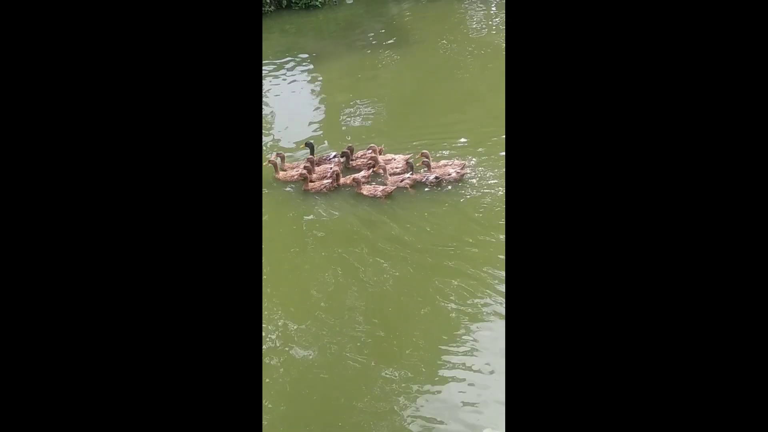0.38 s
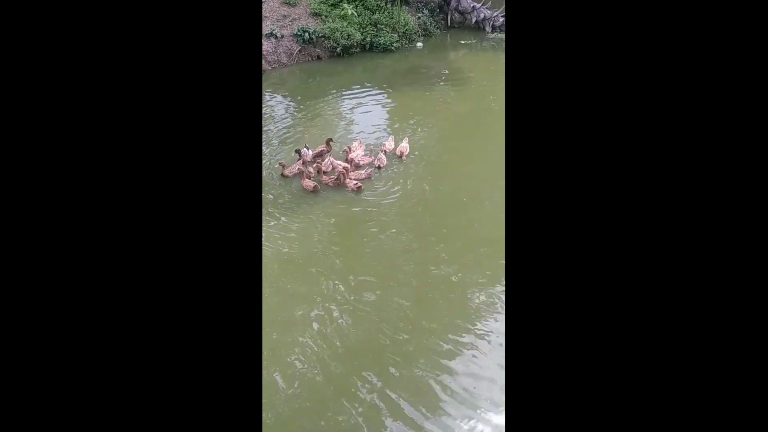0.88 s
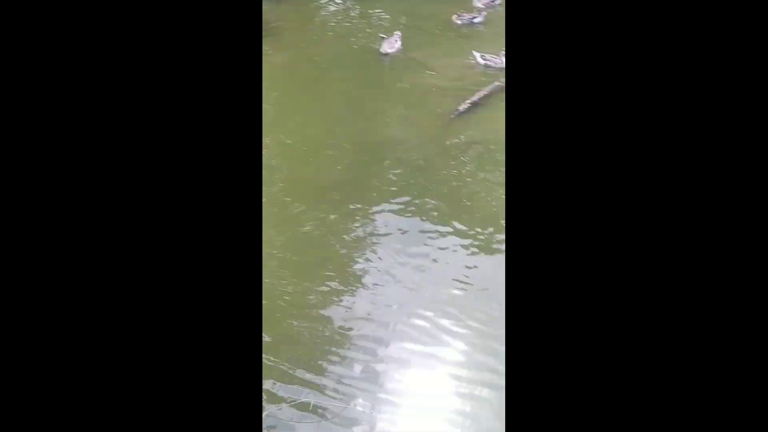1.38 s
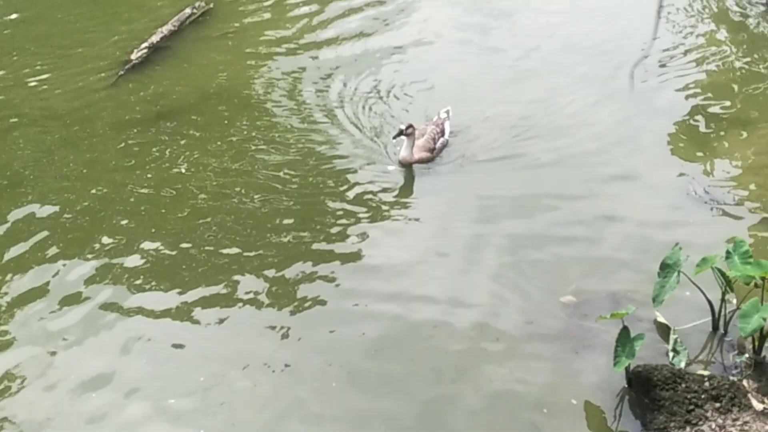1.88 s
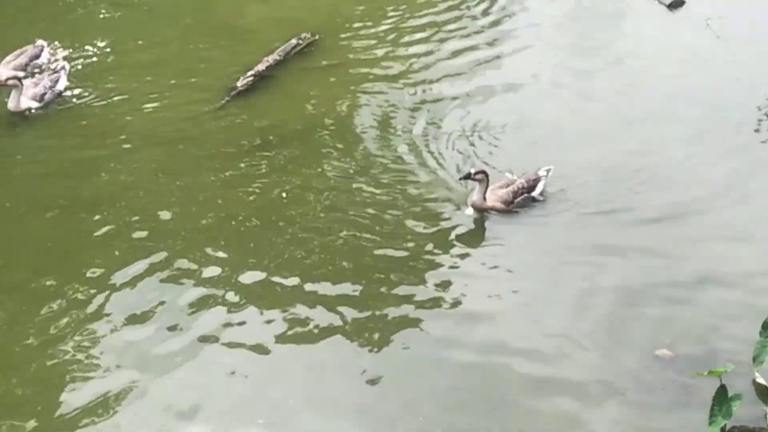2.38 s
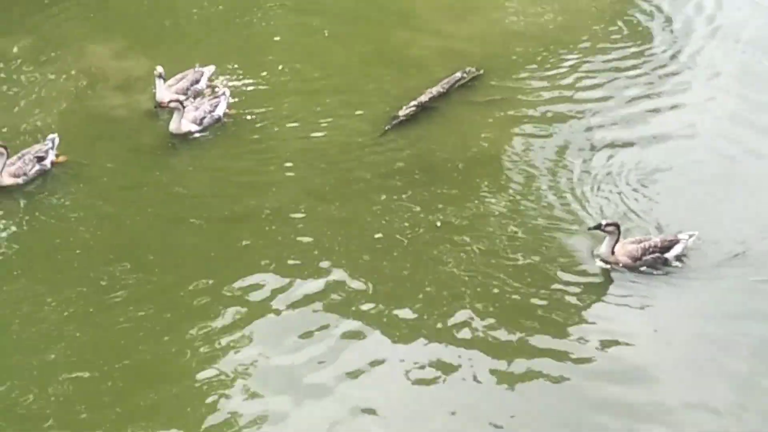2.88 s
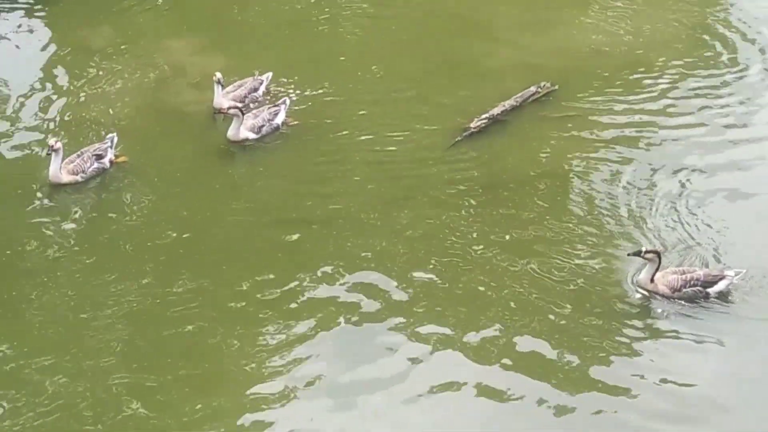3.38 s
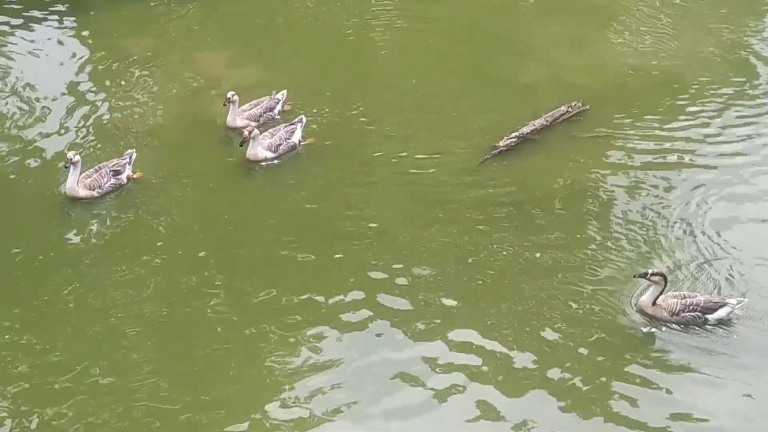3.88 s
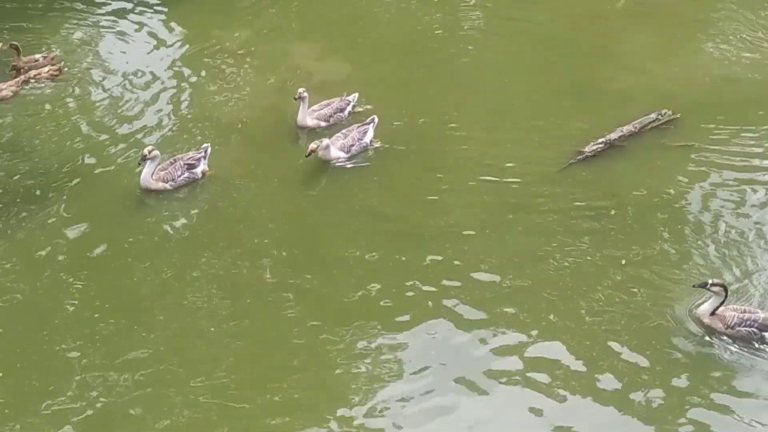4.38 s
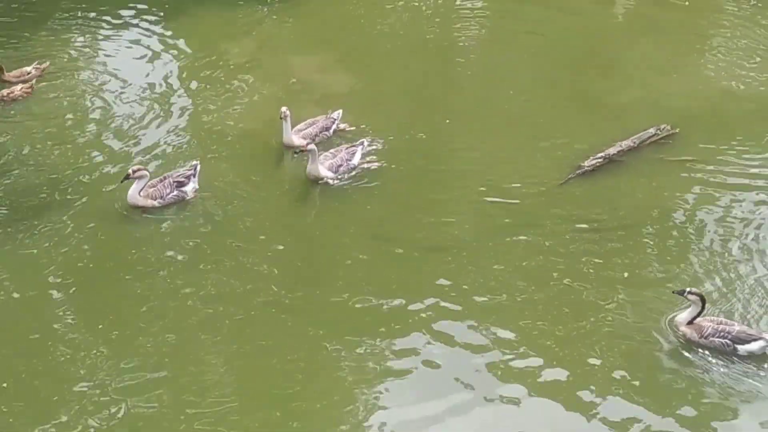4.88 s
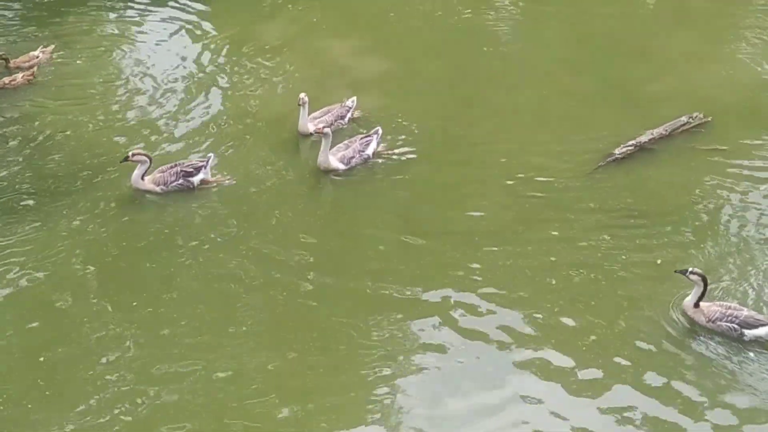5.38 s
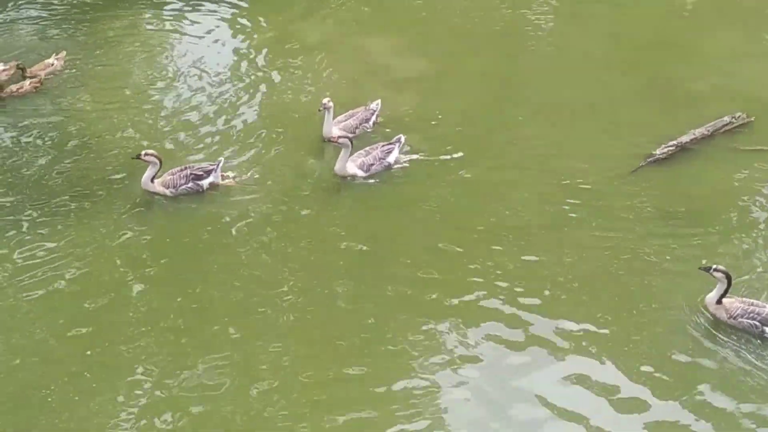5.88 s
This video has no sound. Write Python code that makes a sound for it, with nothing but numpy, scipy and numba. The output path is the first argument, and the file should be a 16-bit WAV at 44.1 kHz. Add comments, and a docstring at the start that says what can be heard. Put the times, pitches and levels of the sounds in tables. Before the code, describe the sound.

From 0 to about 1.9 s a flock of geese and ducks is loud and crowded: low throaty grunts, short quacks and nasal honks near 900 to 1000 Hz overlap in broad, swelling outdoor noise, strongest calls around 0.25, 0.55 to 0.75 and 1.0 to 1.3 s. A small tick comes at 1.6 s, then a rub and dull thump on the case at 1.85 s, a hard cut and about a tenth of a second of silence. From 2 s a far quieter pond fades in: soft air, faint insect shimmer, brief gliding bird whistles and a tiny trill until 3.9 s, with faint rough quacks. At 4.4 s a near goose growls into a ringing honk around 1400 Hz, rasps, then at 4.9 s gives a lower, harsher honk near 940 Hz that drops away by 5.2 s with dull bank echoes. Rough quacks return at 5.6 and 5.96 s. Nearly everything sits right; the thump reaches both sides.

```python
"""Geese and ducks on a pond, heard from the bank by a phone whose left port is nearly deaf to the air.
A honk is a ringing windpipe tone with harmonics, side tones and rasp from the slower flutter of the voice
membranes; quacks, grunts and growls are rough pulses through a throat, songbirds are gliding whistles.
A loud flock scene ends in a handling bump and a short silence; a quieter scene fades in with songbirds,
far quacks and a near double honk. Air is swelling noise, banks send scattered echoes, thuds are damped sines."""
import sys
import numpy as np
from scipy import signal
from scipy.fft import rfft, irfft
from scipy.io import wavfile
from scipy.ndimage import uniform_filter1d, map_coordinates
from numba import njit

SR = 44100
rng = np.random.default_rng(int(sys.argv[2]) if len(sys.argv) > 2 else 0)


def volts(x):
    """Linear amplitude factor 10**(x/20) for a level x in dB, scalar or array-like."""
    e = np.asarray(x, float) / 20
    return 10 ** e


def file_out(sig):
    """Save sig as 16-bit WAV at sys.argv[1]."""
    # one column per channel
    cols = np.atleast_2d(sig).T
    # limit, then scale
    lim = np.clip(cols, -1, 1)
    pcm = np.round(lim * 32767).astype(np.int16)
    wavfile.write(sys.argv[1], SR, pcm)


N = 265041
T = np.arange(N) / SR

# Levels of air and voices are relative: PORT_GAIN follows.
PORT_GAIN, LEFT_LEAK_DB = 2.016, -46.5  # leak of the deaf port, relative to the right one

# Pond air, leaves and far flock, relative spectrum: (frequency [Hz], density [dB])
AIR_SPECTRUM = [(18, -72), (30, -22), (92, -2.5), (359, 0), (546, 4), (874, -0.5), (1640, -6), (2420, -6.5),
                (2760, -8.5), (3980, -8.5), (5040, -11.5), (7460, -9.5), (9430, -14), (10700, -12.5),
                (15500, -33)]
# Pond air level: (time [s], level [dB])
AIR_LEVEL = [(0.0, -44), (0.81, -39.5), (0.92, -46.5), (1.11, -38), (1.31, -42.5), (1.9, -44.5),
             (1.95, -53.5), (2.27, -56), (2.4, -56.5), (3.8, -56), (4.07, -54.5), (4.27, -56.5),
             (4.4, -57.5), (5.3, -51.5), (5.64, -54), (5.79, -58.5), (6.01, -56.5)]
# Insect shimmer: (centre [Hz], width [Hz], level relative to the air [dB])
INSECTS = [(7500, 700, -22), (10950, 250, -25), (14050, 30, -43)]
AIR_SWELL_DB, AIR_FLICKER_DB, INSECT_SWELL_DB = 1.5, 1.5, 5
BANKS_T60_S, BANKS_DB, BANKS_LOWPASS_HZ = 0.5, -18, 1300
LEAF_STIR_MS, LEAF_STIR_PER_S = .12, 45  # moving leaves and ripples blur the echoes

# Hand on the case: (time [s], frequency [Hz], T60 [s], left level [dB], right level [dB])
BUMPS = [(1.855, 107, 0.037, -13.5, -18), (1.6, 900, 0.0045, -19.5, -47), (2.2204, 196, 0.06, -75, -30),
         (2.9, 250.2, 0.0095, -38, -70)]
# Finger rub: (time [s], level [dB])
RUB_LEVEL = [(1.8, -48.5), (1.83, -32), (1.855, -25), (1.87, -30.5), (1.89, -41.5)]

# Songbird notes: (start [s], length [s], first pitch [Hz], last pitch [Hz], level [dB])
BIRD_NOTES = [(1.998, 0.094, 3120, 2920, -53), (2.241, 0.06, 3250, 3070, -65),
              (2.242, 0.031, 5600, 5600, -61), (2.298, 0.072, 4400, 4100, -70),
              (2.348, 0.054, 3850, 3400, -64.5), (2.413, 0.077, 2305, 2240, -63),
              (2.467, 0.036, 1930, 1910, -60.5), (2.65, 0.093, 3250, 3130, -64),
              (2.93, 0.046, 3400, 3500, -64), (2.947, 0.037, 5050, 4650, -60),
              (2.976, 0.072, 4200, 3680, -63), (3.045, 0.058, 3200, 3020, -73),
              (3.53, 0.065, 4690, 4600, -62), (3.58, 0.12, 3020, 2990, -62.5),
              (3.86, 0.079, 3480, 3580, -65)]
# Songbird trill: (start [s], length [s], first pitch [Hz], last pitch [Hz], level [dB], pulse rate [1/s])
BIRD_TRILLS = [(3.735, 0.125, 2980, 3520, -61, 62)]
# Songbird swell: (share of length [0-1], level offset [dB])
NOTE_SHAPE = [(0, -9), (.3, 2), (.7, -2.5), (1, -16)]
BIRD_WAVER_RATIO, BIRD_WAVER_DB = .011, 3.5

# Throat resonances, five tables: (centre [Hz], nominal width [Hz], relative level [dB])
GRUNT_THROAT = [(182.4, 31, -13.5), (470, 90, -15), (680, 61, 1), (830, 64, -5.5), (960, 210, -13),
                (1400, 175, -11.5), (2700, 71, -11.5), (4230, 480, -9)]
QUACK_THROAT = [(242, 120, -14), (850, 176, -4.5), (1550, 340, -5.5), (1844, 100, 1.5), (2255, 183, 2.5),
                (3400, 730, -1), (4420, 540, -2.5), (5900, 1600, -5.5)]
FAR_THROAT = [(1040, 410, -5), (1824, 290, -7), (2670, 290, -4.5), (4200, 1200, -7), (6200, 390, -14.5),
              (7400, 880, -11.5)]
FIRST_THROAT = [(1400, 280, -1), (1910, 71, 0.5), (2860, 560, -1), (3600, 150, 2), (4510, 270, 2),
                (4910, 216, 9.5), (6100, 830, -8.5), (7780, 1220, 0), (11700, 580, -16), (13700, 3000, -24)]
SECOND_THROAT = [(1090, 105, -0.5), (1880, 940, -13), (2966, 166, 5), (4080, 340, -2), (4640, 410, -4),
                 (5600, 1600, -7.5), (9460, 2900, -5.5), (10640, 3200, -13)]
# Growl throat: (centre [Hz], nominal width [Hz], relative level [dB])
GROWL_THROAT = [(170, 78, -23.5), (626, 57, -13.5), (1410, 226, 3.5), (1750, 220, 0.5), (2020, 570, -1),
                (3030, 240, -7), (3820, 320, 1.5), (4710, 660, 3), (5480, 1230, 8.5), (8400, 3000, -5),
                (11070, 2300, -21)]
WIDTH_FACTOR = 2.18  # on the nominal width, for each of two passes
THROAT_HZ, BEAK_HZ, SLIDE_TOP_HZ = 1550, 2500, 6500
PATCHY_DB = 3.5  # separate flicker of each resonance in rasps and pulsed calls
# Resonances that stay put: (time [s], pitch factor)
STILL = [(0, 1), (7, 1)]

# Low grunts, and at 1.055 s the bright upper rasp of a far honk:
# (start [s], length [s], pulse rate [Hz], level [dB], beak level [dB])
GRUNTS = [(0.005, 0.069, 170, -35.5, -42.5), (0.19, 0.18, 172.3, -37.5, -46.5),
          (0.35, 0.22, 198.7, -42, -54), (0.55, 0.066, 187, -34, -60), (0.66, 0.12, 164.6, -28, -45.5),
          (0.835, 0.11, 168.2, -36.5, -46.5), (0.935, 0.085, 168.9, -32.5, -38.5),
          (1.055, 0.16, 174.8, -71.5, -36), (1.2, 0.13, 163.7, -42, -49)]
# Quacks: (start [s], length [s], pulse rate [Hz], level [dB], beak level [dB])
QUACKS = [(0.01, 0.099, 132, -40.5, -55), (0.68, 0.082, 162.7, -57, -32), (0.935, 0.069, 121.5, -57, -36.5),
          (2.32, 0.22, 129, -62.5, -70), (2.64, 0.13, 151.6, -61.5, -62.5), (2.97, 0.13, 150.6, -55.5, -56),
          (3.18, 0.073, 152.3, -57.5, -68), (3.41, 0.14, 150.4, -56.5, -53.5),
          (3.835, 0.094, 144.3, -51, -55), (4.02, 0.36, 122, -53, -58.5), (5.56, 0.32, 130.2, -44.5, -47),
          (5.962, 0.095, 142.2, -45.5, -50.5)]
# Swell of the grunts and that rasp: (share of length [0-1], level offset [dB])
GRUNT_SHAPE = [(0, -8), (.25, -1), (.7, -2), (1, -21)]
# Quack swell: (share of length [0-1], level offset [dB])
QUACK_SHAPE = [(0, -7.5), (.15, -2), (.7, -4.5), (1, -39)]
GRUNT_ROUGH, QUACK_ROUGH, GROWL_ROUGH = .25, .38, .27  # roughness, 0-1

# Far honks: (start [s], length [s], first, middle, last pitch [Hz], tone level [dB],
# 2nd harmonic level [dB], roughness [0-1])
FAR_HONKS = [(0.005, 0.1, 960, 990, 1010, -40, -64, 0.75), (0.125, 0.16, 960, 1006, 1007, -50, -71, 0.02),
             (0.254, 0.08, 1073, 1033, 997, -33.5, -44.5, 0.45),
             (0.337, 0.059, 967, 965, 960, -44.5, -62, 0.6),
             (0.546, 0.1435, 934, 957, 925, -30.5, -29.5, 0.35),
             (1.039, 0.26, 891, 915, 839, -37.5, -43.5, 0.3)]
# Far honk swell: (share of length [0-1], level offset [dB])
HONK_SHAPE = [(0, -15), (.15, -3.5), (.5, -2), (.75, -4.5), (1, -18.5)]
# Far voice: (flutter [Hz], 7th harmonic over 5th [dB], lower side tones over upper [dB],
# rasp offset before roughness [dB])
FAR_VOICE = (170.5, 15, -6, -1.5)
# Harmonics relative to the 2nd: (3rd [dB], 4th [dB], 5th [dB], 6th [dB])
FAR_HARMONICS_DB = (-19.5, -8, -28, -15)
FAR_SIDES_DB = -13.5  # relative to the tone
RASP_DB_PER_ROUGH = 13

# Near honks: (time [s], tone [Hz], tone level [dB], 2nd to 6th harmonic levels [dB] x 5,
# side tones through the low throat [dB], through the high throat [dB])
FIRST_HONK = [(4.46, 1402, -55, -70, -62, -80, -80, -80, -43, -50),
              (4.49, 1369, -30.5, -64, -60, -80, -80, -80, -30, -52),
              (4.52, 1388, -23.5, -65, -60, -80, -80, -80, -32, -33),
              (4.555, 1382, -23, -31, -58, -70, -70, -70, -23, -36),
              (4.585, 1400, -18.5, -29.5, -59, -62, -62, -62, -25.5, -25),
              (4.62, 1410, -19, -21.5, -60, -60, -63, -60, -28, -26),
              (4.7, 1405, -21, -22.5, -59, -60, -62, -60, -33, -28.5),
              (4.725, 1398, -41, -42, -67, -75, -75, -75, -25.5, -27.5),
              (4.765, 1421, -50, -40, -63, -74, -80, -80, -45, -43),
              (4.815, 1400, -64, -59, -66, -76, -80, -80, -59, -48)]
# Second near honk: same columns
SECOND_HONK = [(4.89, 963, -58, -40, -49, -37, -57, -57, -50, -40),
               (4.912, 961, -38, -18.5, -52, -31, -49, -28, -56, -42),
               (4.93, 957, -40, -19.5, -56, -16.5, -27, -31, -60, -47),
               (4.945, 950.5, -34, -20.5, -46, -21, -21, -24, -60, -43),
               (4.965, 938.4, -32.5, -25, -30, -32, -26.5, -37, -56, -31.5),
               (4.99, 944, -29.5, -24, -24.5, -24, -23, -22.5, -59, -34),
               (5.006, 948, -26, -32, -21.5, -25, -40, -17, -50, -32.5),
               (5.02, 941, -26.5, -49, -36, -30, -43, -27, -41, -23.5),
               (5.05, 941, -27.5, -30, -41, -25, -47, -34, -27, -24.5),
               (5.065, 936.7, -28, -36, -41, -47, -48, -40, -26.5, -22),
               (5.09, 941, -26.5, -43, -46, -48, -50, -45, -24, -26),
               (5.112, 951, -24.5, -58, -50, -34, -52, -50, -23, -34),
               (5.122, 898, -32.5, -29.5, -20, -26, -53, -50, -38, -29),
               (5.14, 866, -36.5, -33, -25.5, -58, -55, -55, -25.5, -42),
               (5.158, 870, -45, -61, -49, -51, -63, -60, -30, -53),
               (5.19, 883, -61.5, -71, -67, -70, -72, -70, -61, -68)]
# First voice: (flutter [Hz], superseded by the lock, 7th harmonic over 5th [dB],
# lower side tones over upper [dB], rasp offset before roughness [dB])
FIRST_VOICE = (173, -5, -1, -10.5)
# Second voice: (flutter [Hz], 7th harmonic over 5th [dB], lower side tones over upper [dB],
# rasp offset [dB], roughness [0-1])
SECOND_VOICE = (168, -7, -4, -5.5, 0.18)
# First honk breaks in, clears and breaks up again: (time [s], roughness [0-1])
FIRST_ROUGH = [(4.46, .45), (4.555, .38), (4.6, .05), (4.705, .05), (4.73, .5), (4.815, .5)]
# First honk's upper resonances slide as beak and neck move: (time [s], pitch factor)
FIRST_SLIDE = [(4.46, 1.3), (4.52, 1.1), (4.59, 1.027), (4.7, 0.98), (4.73, 1.044), (4.815, 0.91)]
# Growls' own slide of the upper resonances: (time [s], pitch factor)
GROWL_SLIDE = [(4.42, 1.03), (4.47, 1.03), (4.5, 0.97), (4.58, .85), (4.69, 1), (4.73, 0.97), (4.81, 1.01),
               (4.87, 1.09), (4.93, 1.01), (5.1, 1.1), (5.2, 1.06)]
# Growls into, between and out of the near honks, one list each:
# (time [s], pulse rate [Hz], chest level [dB], throat level [dB], beak level [dB])
GROWLS = [
    [(4.4195, 133.7, -65, -46, -39), (4.43, 137.1, -50, -41.5, -35.5), (4.445, 142.1, -34, -34, -27),
     (4.465, 160.3, -30.5, -33.5, -26.5), (4.49, 167.7, -28, -45, -26), (4.545, 171.9, -34.5, -44, -23.5),
     (4.6, 173.5, -43, -60, -41)],
    [(4.7, 178.8, -42, -53, -25), (4.73, 173.9, -34.5, -33.5, -30), (4.76, 168.3, -35.5, -38, -28.5),
     (4.794, 153, -34.5, -52, -33.5), (4.812, 154.5, -38, -55, -38), (4.845, 170, -45, -46, -30.5),
     (4.87, 175.2, -36.5, -32.5, -29.5), (4.898, 197.5, -26.5, -27, -24.5), (4.93, 196, -38, -52, -29)],
    [(5.1, 153.8, -48, -59, -31), (5.135, 148.4, -27.5, -33, -48), (5.165, 136.7, -54, -37.5, -29),
     (5.2, 141, -68, -66, -45.5)],
]
# Near goose's echo off the water: (time [s], lag [ms])
SKIM_LAG = [(4.45, .082), (4.53, .08), (4.59, .07), (4.78, .069), (4.9, .063), (5.2, .061)]
FLUTTER_DB = -57.5  # the flutter itself, under the near honks
LOCK_CYCLES = 8  # windpipe cycles per flutter beat in the first honk

CUT_S, CUT_DB_PER_S = 1.887, 5000
FADE_IN_S, FADE_LENGTH_S, FADE_POWER = 1.99, .175, 2.1
RUMBLE_HZ, TOP_HZ = 60, 15450


def unit(x):
    """Scale to rms 1."""
    return x / np.sqrt(np.mean(x ** 2))


def walk(rate_hz, n=N):
    """Smooth random wander of spread near 1."""
    k = max(int(SR / rate_hz), 2)
    steps = np.repeat(rng.standard_normal(n // k + 1), k)
    return 1.427 * uniform_filter1d(uniform_filter1d(steps, k), k)[:n]


def curve_at(t, table):
    """Interpolate a two-column table."""
    return np.interp(t, *np.transpose(table))


@njit
def svf(x, g, k):
    """State-variable band-pass with moving coefficients."""
    y, b, l = np.empty(len(x)), 0., 0.
    for i in range(len(x)):
        v = (b + g[i] * (x[i] - l)) / (1 + g[i] * (g[i] + k[i]))
        b, l, y[i] = 2 * v - b, l + 2 * g[i] * v, k[i] * v
    return y


def band(x, hz, width_hz):
    """A resonance with gain 1 at its centre, which may move."""
    if np.ptp(hz) == 0:
        centre_hz = np.max(hz)
        return signal.lfilter(*signal.iirpeak(centre_hz, centre_hz / width_hz, SR), x)
    return svf(x + 0., np.tan(np.pi * hz / SR), width_hz / hz)


def throat(x, peaks, slide=1, patchy_db=0):
    """Parallel resonances of alternating sign, each applied twice for dark valleys; the middle ones slide."""
    out = 0
    for k, (hz, width_hz, db) in enumerate(peaks):
        if THROAT_HZ < hz < SLIDE_TOP_HZ:
            hz = hz * slide
        width_hz = WIDTH_FACTOR * width_hz
        gain = volts(db + patchy_db * walk(28.1, len(x)))
        out = out + (-1) ** k * gain * band(band(x, hz, width_hz), hz, width_hz)
    return out


def shaped(start_s, length_s, shape):
    """Times, progress 0-1 and level offsets of one call."""
    share, db = np.transpose(shape)
    return start_s + length_s * share, share, db


def spread(table):
    """Sample span, soft-edged gate and interpolated columns of a call."""
    s, *columns = np.transpose(table)
    at = slice(int(s[0] * SR), min(int(s[-1] * SR), N))
    gate = np.clip(np.minimum(T[at] - s[0], s[-1] - T[at]) / .004, 0, 1)
    return at, gate, [np.interp(T[at], s, c) for c in columns]


def spin(hz, jitter):
    """A turning phasor whose speed trembles."""
    return np.exp(2j * np.pi * np.cumsum(hz * (1 + jitter * walk(300, len(hz)))) / SR)


def air():
    """Octave bands of coloured noise that swell together and flicker alone, with insect shimmer on top."""
    hz = np.maximum(np.fft.rfftfreq(N, 1 / SR), 1)
    spectrum_hz, spectrum_db = np.transpose(AIR_SPECTRUM)
    colour = rfft(rng.standard_normal(N)) * volts(np.interp(np.log(hz), np.log(spectrum_hz), spectrum_db))
    swell_db, octave = AIR_SWELL_DB * walk(12), np.log2(hz / 30)
    noise = 0
    for k in range(11):
        octave_noise = irfft(colour * np.clip(1 - np.abs(octave - k), 0, 1), N)
        noise = noise + octave_noise * volts(swell_db + AIR_FLICKER_DB * walk(16))
    shimmer = 0
    for centre_hz, width_hz, db in INSECTS:
        level = volts(db + INSECT_SWELL_DB * np.tanh(walk(5.7)))
        shimmer = shimmer + level * unit(band(rng.standard_normal(N), centre_hz, width_hz))
    return (unit(noise) + shimmer) * volts(curve_at(T, AIR_LEVEL))


def banks(x):
    """Dull scattered echoes from banks and trees: a decaying noise tail, its lag stirred at random."""
    t = T[:SR // 2]
    lag = LEAF_STIR_MS * SR / 1000 * walk(LEAF_STIR_PER_S)
    stirred = map_coordinates(x, [np.arange(N) + lag], order=1)
    tail = rng.standard_normal(len(t)) * np.exp(-np.log(1000) * t / BANKS_T60_S)
    tail = tail * np.clip(t / 0.017, 0, 1)
    tail = signal.lfilter(*signal.butter(1, BANKS_LOWPASS_HZ, fs=SR), tail)
    return volts(BANKS_DB) * signal.fftconvolve(stirred, tail / np.sqrt(np.sum(tail ** 2)))[:N]


def handling():
    """Damped thuds through the case reach both ports; the rub, band noise, only the open one."""
    out = np.zeros((2, N))
    for s, hz, t60_s, *db in BUMPS:
        t = np.maximum(T - s, 0)
        thud = np.sin(2 * np.pi * hz * t) * np.exp(-np.log(1000) * t / t60_s)
        out += volts(db)[:, None] * thud
    noise = rng.standard_normal(N)
    rub = unit(band(noise, 370, 800) + 0.5 * band(noise, 6500, 4000)) * volts(2.8 * walk(150))
    out[1] += rub * volts(np.interp(T, *np.transpose(RUB_LEVEL), left=-120, right=-120))
    return out


def songbirds():
    """Short wavering whistles that glide; a trill is chopped into quick pulses."""
    out = np.zeros(N)
    for start_s, length_s, first_hz, last_hz, level_db, *trill_hz in BIRD_NOTES + BIRD_TRILLS:
        s, share, offset_db = shaped(start_s, length_s, NOTE_SHAPE)
        glide_hz = first_hz + (last_hz - first_hz) * share
        at, gate, (hz, db) = spread(np.transpose([s, glide_hz, level_db + offset_db]))
        chop = np.cos(np.pi * sum(trill_hz) * T[at]) ** 2  # 1 throughout for a plain note
        waver = volts(BIRD_WAVER_DB * walk(68, len(hz)))
        out[at] += gate * volts(db) * unit(chop * spin(hz, BIRD_WAVER_RATIO).imag * waver)
    return out


def pulsed(tables, peaks, rough, edges_hz=(0, BEAK_HZ, SR), slide=STILL):
    """Uneven membrane pulses and gated breath through a throat; an open beak lets upper resonances out."""
    out = np.zeros(N)
    for table in tables:
        at, gate, (hz, *levels_db) = spread(table)
        n = len(hz)
        flap = spin(hz, 0.185 * rough)
        pulses = unit((flap / (1 - 0.921 * flap)).real) * volts(5.4 * rough * walk(122, n))
        breath = unit(np.abs(1 / (1 - 0.2 * flap)) ** 2 * rng.standard_normal(n))
        # each closing of the membranes is a short ragged burst, not one click
        burst = rng.standard_normal(SR // 200) * np.exp(-T[:SR // 200] / 0.002)
        burst = irfft(np.exp(1j * np.angle(rfft(burst))))  # smeared in time, even in colour
        source = (1 - rough) * unit(np.convolve(pulses, burst, "same")) + rough * breath
        factor = curve_at(T[at], slide)
        for db, low_hz, high_hz in zip(levels_db, edges_hz, edges_hz[1:]):
            part = [p for p in peaks if low_hz < p[0] < high_hz]
            out[at] += gate * volts(db) * unit(throat(source, part, factor, PATCHY_DB))
    return out


def calls(rows, shape):
    """Control tables of pulsed calls on a shared swell."""
    out = []
    for start_s, length_s, hz, db, beak_db in rows:
        s, _, offset_db = shaped(start_s, length_s, shape)
        out.append(np.transpose([s, hz + 0 * s, db + offset_db, beak_db + offset_db]))
    return out


def grunts_and_upper_rasp():
    """Membrane pulses through a throat: low grunts, and the bright upper rasp of a far honk."""
    return pulsed(calls(GRUNTS, GRUNT_SHAPE), GRUNT_THROAT, GRUNT_ROUGH)


def quacks():
    """Quacks: rougher membrane pulses with a sharper start."""
    return pulsed(calls(QUACKS, QUACK_SHAPE), QUACK_THROAT, QUACK_ROUGH)


def voiced(curve, voice):
    """All controls of a honk: 7th harmonic, lower side tones and rasp follow the moving levels."""
    s, hz, *tone_db, low_db, high_db = np.transpose(curve)
    flutter_hz, seventh_db, lower_db, rasp_db, rough = voice
    side_db = np.maximum(low_db, high_db)
    total_db = 10 * np.log10(sum(volts(db) ** 2 for db in (*tone_db, side_db)))
    return np.transpose([s, flutter_hz + 0 * s, hz, *tone_db, tone_db[-2] + seventh_db, low_db, high_db,
                         lower_db + 0 * s, (total_db + side_db) / 2 + rasp_db, rough + 0 * s])


def honk(table, peaks, flutter_db=-90, lock=0, slide=STILL):
    """Windpipe tone with harmonics; the flutter adds side tones above and below each, and gates a rasp."""
    at, gate, (flutter_hz, hz, *tone_db, low_db, high_db, lower_db, rasp_db, rough) = spread(table)
    n = len(hz)
    factor = curve_at(T[at], slide)
    if lock:  # the flutter locks to a whole fraction of the tone
        flap = spin(hz / lock, 0.023 * rough)
        tone = flap ** lock
    else:
        tone, flap = spin(hz, 0.035 * rough), spin(flutter_hz, 0.032 * rough)
    # staggered phases keep tone and side tones from piling into one spike
    clean = np.sqrt(2) * sum(volts(db) * (tone ** k * np.exp(1j * k ** 2)).imag
                             for k, db in enumerate(tone_db, 1))
    clean = clean * volts(7.9 * rough * walk(61.6, n))
    stack = sum(tone ** k * np.exp(1j * k * k) for k in range(1, 11))
    row = sum(volts(-6.5 * k) * flap ** (k + 1) * np.exp(2j * k * k) for k in range(4))
    rows = (stack * (row - volts(lower_db) * row.conj())).imag
    low_sides = volts(low_db) * throat(rows, [p for p in peaks if p[0] < BEAK_HZ], factor)
    high_sides = volts(high_db) * throat(rows, [p for p in peaks if p[0] > BEAK_HZ], factor)
    puffs = np.abs(1 / (1 - 0.16 * flap)) ** 2 * rng.standard_normal(n)
    rasp = volts(rasp_db + 3.2 * walk(35.4, n)) * unit(throat(puffs, peaks, factor, PATCHY_DB))
    out = np.zeros(N)
    out[at] = gate * (clean + low_sides + high_sides + rasp + volts(flutter_db) * flap.imag)
    return out


def far_honks():
    """Flock honks: one swell each, gliding in pitch; the rougher, the more rasp."""
    out = 0
    *voice, rasp_db = FAR_VOICE
    for start_s, length_s, *hz, tone_db, second_db, rough in FAR_HONKS:
        s, share, offset_db = shaped(start_s, length_s, HONK_SHAPE)
        tone_db, second_db = tone_db + offset_db, second_db + offset_db
        harmonics_db = [second_db + db for db in FAR_HARMONICS_DB]
        sides_db = tone_db + FAR_SIDES_DB
        curve = np.transpose([s, np.interp(share, (0, .5, 1), hz), tone_db, second_db, *harmonics_db,
                              sides_db, sides_db])
        controls = voiced(curve, (*voice, rasp_db + RASP_DB_PER_ROUGH * rough, rough))
        out = out + honk(controls, FAR_THROAT)
    return out


def skim(x):
    """The glancing echo off the water cancels a treble band that moves as the head moves."""
    lag = curve_at(T, SKIM_LAG) * SR / 1000
    return (x + 0.98 * map_coordinates(x, [np.arange(N) - lag])) / 2


def near_goose():
    """Double honk, the first locked to its flutter, joined by growls of rough membrane pulses."""
    rough = curve_at(np.transpose(FIRST_HONK)[0], FIRST_ROUGH)
    *voice, rasp_db = FIRST_VOICE
    controls = voiced(FIRST_HONK, (*voice, rasp_db + RASP_DB_PER_ROUGH * rough, rough))
    first = honk(controls, FIRST_THROAT, FLUTTER_DB, lock=LOCK_CYCLES, slide=FIRST_SLIDE)
    second = honk(voiced(SECOND_HONK, SECOND_VOICE), SECOND_THROAT, FLUTTER_DB)
    growls = pulsed(GROWLS, GROWL_THROAT, GROWL_ROUGH, edges_hz=(0, THROAT_HZ, BEAK_HZ, SR), slide=GROWL_SLIDE)
    return skim(first + second + growls)


def scene():
    """Near goose fairly dry, the rest wetter; nearly all of it lands on the right port."""
    near = near_goose()
    far = songbirds() + grunts_and_upper_rasp() + quacks() + far_honks()
    pond = PORT_GAIN * (near + far + banks(near + volts(3.5) * far) + air())
    return np.array([[volts(LEFT_LEAK_DB)], [1]]) * pond + handling()


def cut_and_fade():
    """Gain: the first scene is cut off, the second fades in."""
    cut = volts(-CUT_DB_PER_S * np.clip(T - CUT_S, 0, .1))
    return cut + np.clip((T - FADE_IN_S) / FADE_LENGTH_S, 0, 1) ** FADE_POWER


def top_cut(x):
    """Nothing passes above the cut-off."""
    return signal.sosfilt(signal.butter(12, 15730, fs=SR, output="sos"), x)


def record(dry):
    """Rumble filter, top cut, then the cut and fade between scenes."""
    x = signal.sosfilt(signal.butter(2, RUMBLE_HZ, "high", fs=SR, output="sos"), dry)
    x = signal.sosfilt(signal.ellip(8, .2, 70, TOP_HZ, fs=SR, output="sos"), x)
    return top_cut(x * cut_and_fade())


dry = scene()
out = record(dry)
file_out(out)
```